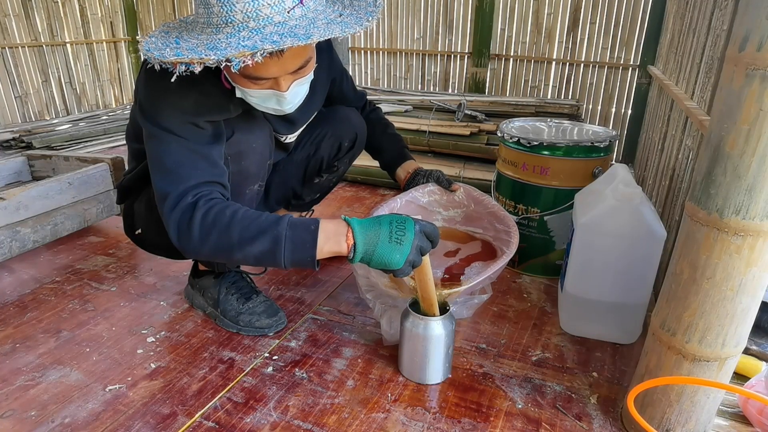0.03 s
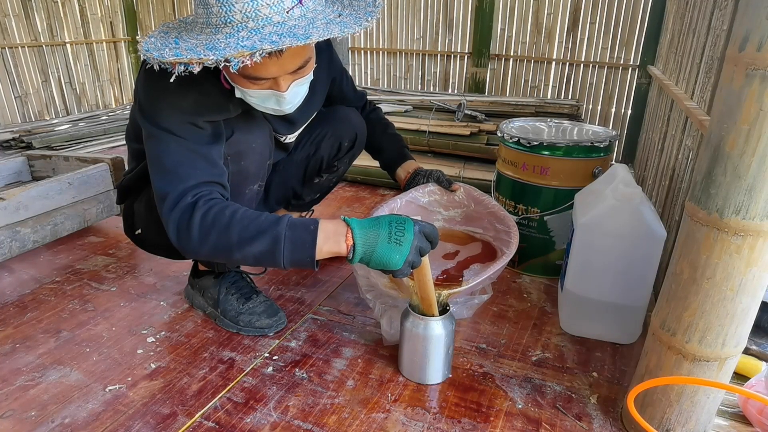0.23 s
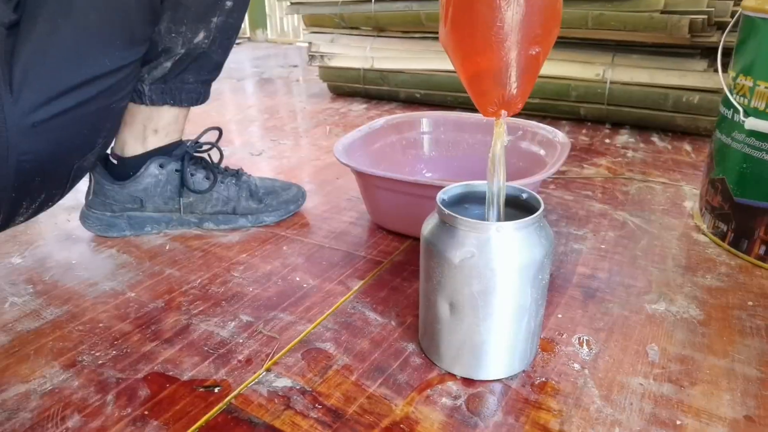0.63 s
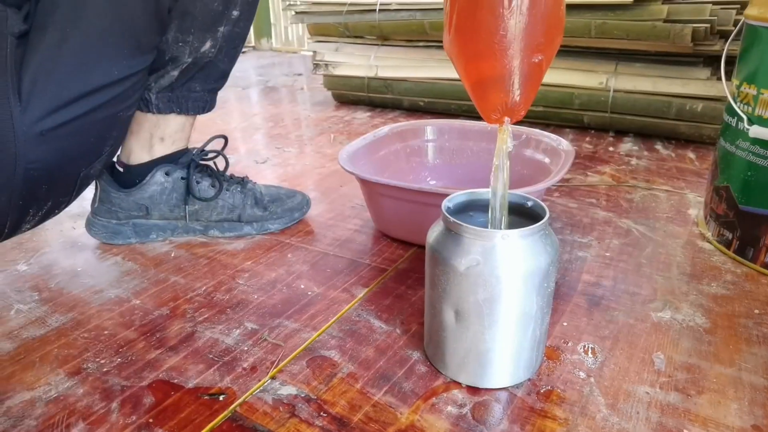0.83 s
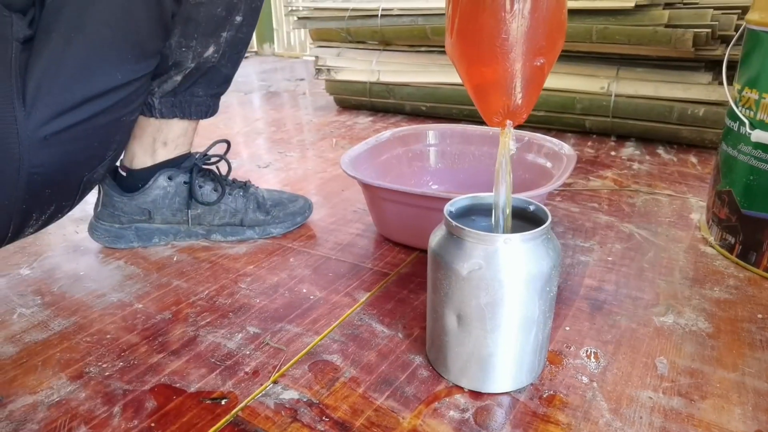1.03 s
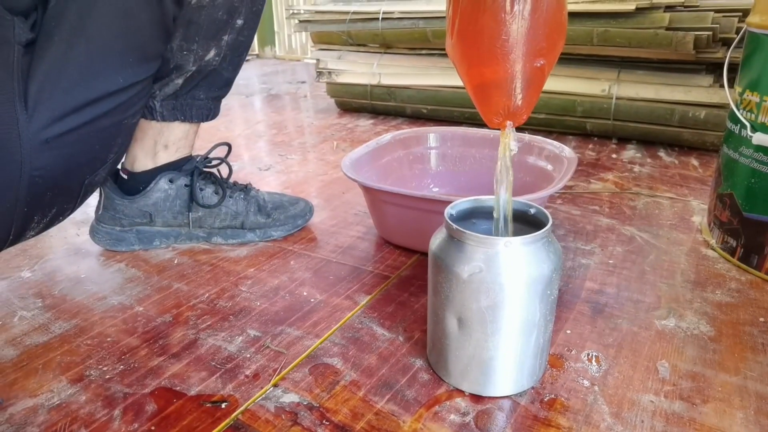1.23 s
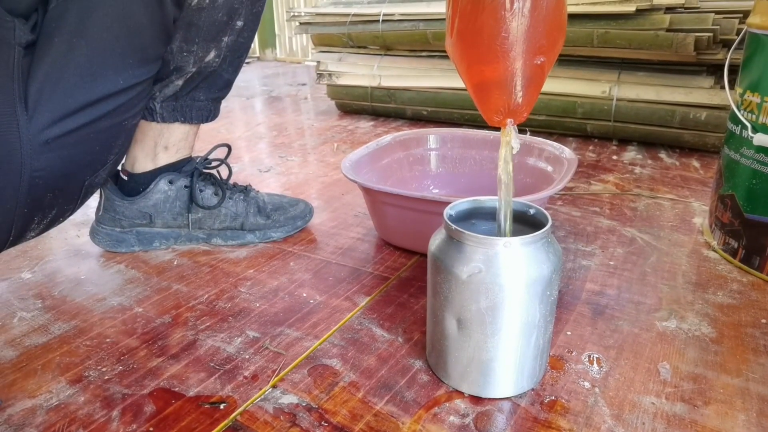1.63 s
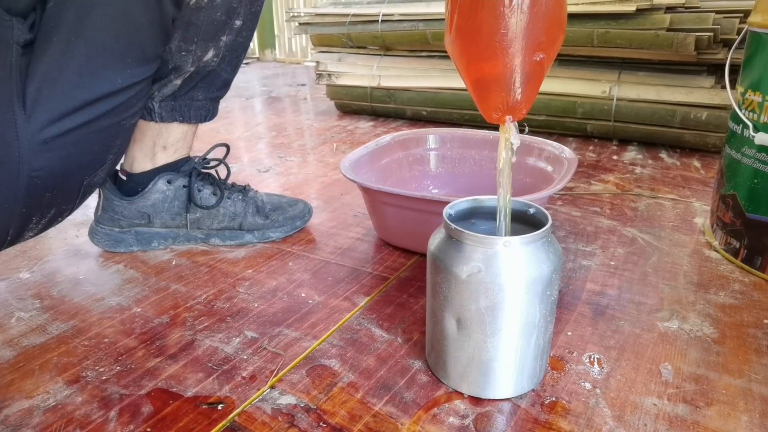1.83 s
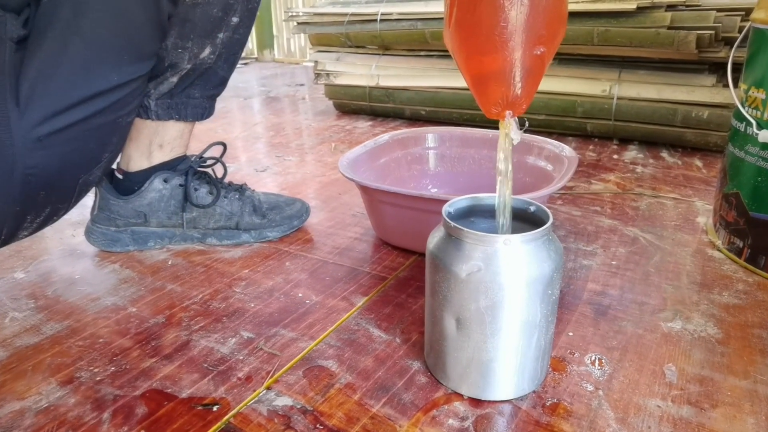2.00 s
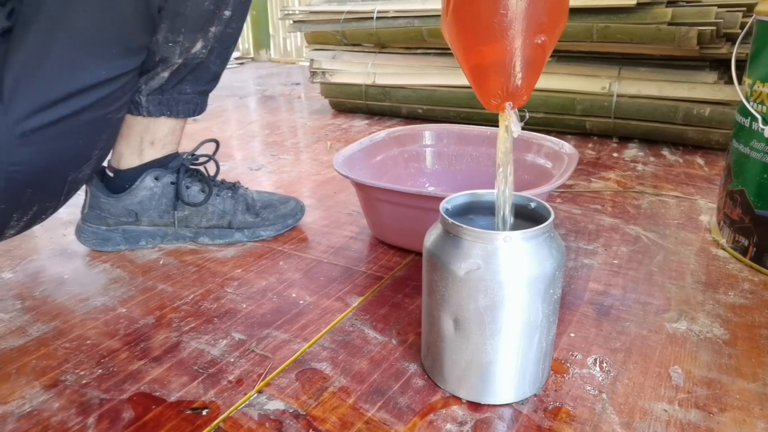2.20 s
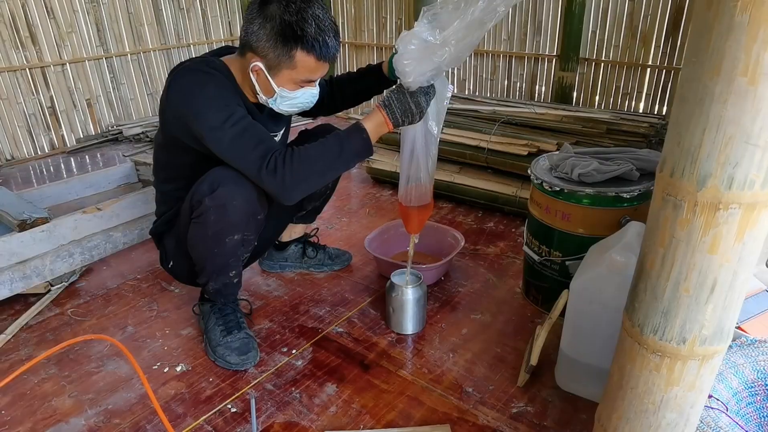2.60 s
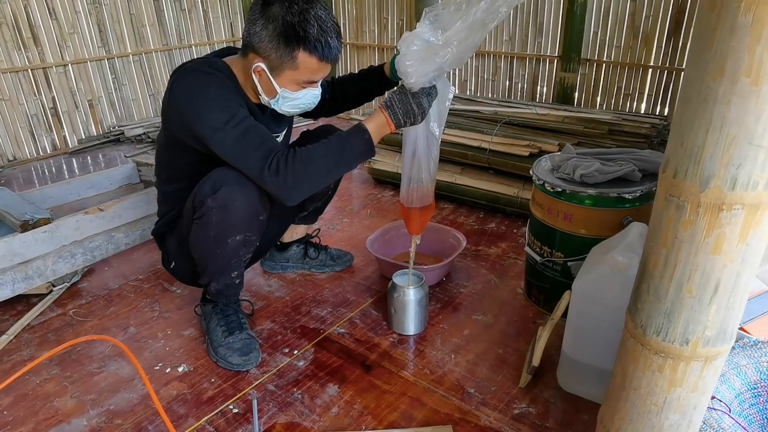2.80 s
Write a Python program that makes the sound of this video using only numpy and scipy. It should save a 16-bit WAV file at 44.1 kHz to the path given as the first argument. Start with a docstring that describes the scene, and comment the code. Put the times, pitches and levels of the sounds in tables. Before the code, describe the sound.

Liquid pours into a small metal canister in a bamboo hut. It first dribbles through a strainer a step away, then streams from a funnel close up, fizzing and gurgling with a rising hollow ring, and ends as a faint, distant trickle.

```python
"""A pattering dribble with one gush, a step away: liquid runs through a strainer into a small metal
canister in a bamboo hut. Then, close up, a stream from a funnel bursts into tiny bubbles, gurgles
and plops, and the air in the canister rings higher as it fills. Last, a faint trickle from across
the hut. Bubbles are short rising rings, blurred by the canister walls and the hut; the air
resonances are driven by random impacts."""
import sys
import numpy as np
from scipy import signal
from scipy.fft import rfft, irfft
from scipy.io import wavfile

SR = 44100
rng = np.random.default_rng(int(sys.argv[2]) if len(sys.argv) > 2 else 0)


def pcm_store(signal):
    """Save signal as 16-bit PCM."""
    levels = np.round(np.clip(np.atleast_2d(signal), -1, 1) * 32767)
    wavfile.write(sys.argv[1], SR, levels.astype(np.int16).T)


N = 130095
T = np.arange(N) / SR
CLOSE_S, AWAY_S, CUT_S = 0.619, 2.657, 0.001  # the listener moves close, then away
WALL_FADE_S, HUT_FADE_S, HUT_DB, FAR_HUT_DB = 0.0024, 0.03, -1.5, -1
NECK_PAN_DB, FIZZ_PAN_DB = 3.5, 1.0  # left over right
DROPS_PER_S, DROP_SPREAD_DB, BUBBLES_PER_S = 2000, 2, 5200


def amp(db):
    """Decibels to gain."""
    return 10 ** (np.asarray(db) / 20)


def unit_rms(x):
    """Scales to an rms of one."""
    return x / np.sqrt(np.mean(x ** 2) + 1e-20)


def unit_burst(x):
    """A short stereo sound at unit energy per side, as samples x sides."""
    short = x[:, :SR // 6].T
    return short / np.linalg.norm(short, axis=0)


def curve(table, column=1):
    """One table column interpolated over time."""
    rows = np.array(table)
    return np.interp(T, rows[:, 0], rows[:, column])


def pan(db):
    """Left and right gains."""
    return amp([[db / 2], [-db / 2]])


def add(mix, start_s, sound):
    """Mixes a sound in, in place."""
    part = mix[round(start_s * SR):][:len(sound)]
    part += sound[:len(part)]


def wander(hz):
    """Low-passed random drift, unit rms."""
    f = np.fft.rfftfreq(N, 1 / SR)
    return unit_rms(irfft(rfft(rng.standard_normal(N)) / (1 + (f / hz) ** 4), N))


def colour(x, spectrum):
    """Minimum-phase filter, unit rms out."""
    hz, db = np.transpose(spectrum)
    f = abs(np.fft.fftfreq(4096, 1 / SR))
    log_gain = np.log(amp(np.interp(np.log(f + 1), np.log(hz), db)))
    taps = np.fft.ifft(np.exp(np.conj(signal.hilbert(log_gain)))).real
    return unit_rms(signal.oaconvolve(x, taps[None], axes=1)[:, :N])


def resonate(x, hz, width_hz, skirt_hz):
    """Two resonators in series at one pitch, which may glide; the second steepens the skirts."""
    carrier = np.exp(2j * np.pi * np.cumsum(hz * np.ones(N)) / SR)
    for band_hz in (width_hz, skirt_hz):
        pole = np.exp(-np.pi * band_hz / SR)
        baseband = signal.lfilter([1 - pole], [1, -pole], x / carrier + 1e-18)
        x = unit_rms((carrier * baseband).real)
    return x


def impacts(per_s, spread_db):
    """Random clicks of uneven size."""
    size = amp(spread_db * np.minimum(rng.exponential(1, N), 4))
    return size * rng.choice([-1, 1], N) * (rng.random(N) < per_s / SR)


def reflect(x, hut_db=HUT_DB, wall_s=WALL_FADE_S):
    """Stereo reflections build and die in the canister, followed by the hut's short tail."""
    t = T[:SR // 6]
    wall_noise, hut_noise = rng.standard_normal((2, 3, len(t)))
    wall_sides = wall_noise[:2] + 0.25 * wall_noise[2]  # partly shared
    wall = unit_rms(wall_sides * np.sqrt(t) * np.exp(-t / wall_s))
    hut = unit_rms(hut_noise[:2] * np.exp(-t / HUT_FADE_S) * (1 - np.exp(-t / wall_s)))
    response = (wall + amp(hut_db) * hut) / np.sqrt(len(t))
    return signal.oaconvolve(x[None], response, axes=1)[:, :N]


def bubble(hz, cycles):
    """A ring that rises in pitch as it dies; `cycles` periods per decay time."""
    age = np.arange(int(6 * cycles * SR / hz)) / SR * hz / cycles  # in decay times
    envelope = (1 - np.exp(-3 * age)) * np.exp(-age)
    return envelope * np.sin(2 * np.pi * cycles * (age + 0.037 * age ** 2 / 2))


def bubbles(per_s, spread_db, hut_db, cycles=2.97, sizes=32):
    """A swarm of bubbles of all sizes, arriving in clumps."""
    clumps = amp(3.5 * wander(hz=65))
    out = np.zeros((2, N))
    for hz in np.geomspace(700, 14500, sizes):
        onsets = impacts(per_s / sizes, spread_db) * clumps
        rings = signal.oaconvolve(onsets, bubble(hz, cycles) * hz)[:N]
        out += reflect(rings, hut_db)
    return unit_rms(out)


def rumble(spectrum, correlation=0.892):
    """Coloured noise, nearly alike on both sides."""
    left, other = rng.standard_normal((2, N))
    right = correlation * left + np.sqrt(1 - correlation ** 2) * other
    return colour(np.array([left, right]), spectrum)


# strained dribble (time [s], patter [dB], canister ring [dB], thudding [dB])
DRIBBLE_LEVELS = [(0, -46.5, -67, -78), (.08, -52.5, -55, -59), (.186, -49, -70, -72),
                  (.205, -41.5, -53, -65), (.27, -42.5, -49.5, -50), (.31, -39.5, -45.5, -43.5),
                  (.345, -46.5, -48.5, -48), (.385, -47.5, -41.5, -45), (.44, -48, -61.5, -57),
                  (.51, -52, -54, -51.5), (.61, -50, -71, -58.5)]
# patter and thud spectra (frequency [Hz], gain [dB])
PATTER_SPECTRUM = [(300, 7), (750, -9.5), (1000, -13.5), (1450, -11.5), (1900, -4.5), (2130, -3),
                   (2380, -2), (2900, -10.5), (4200, -3.5), (4900, -3.5), (5900, 1.5), (7200, -7),
                   (8700, -9.5), (11000, -19.5), (16000, -28)]
THUD_SPECTRUM = [(25, -26), (65, 1), (110, -0.5), (155, 5.5), (230, -13), (310, 0), (450, -8), (700, -46),
                 (1500, -55)]
# canister ring (time [s], pitch [Hz])
EMPTY_PITCH = [(.1, 427), (.25, 416), (.36, 392), (.45, 395)]

def dribble():
    """Strained liquid patters into the nearly empty canister, whose ring sags under the gush."""
    patter = colour(bubbles(DROPS_PER_S, DROP_SPREAD_DB, FAR_HUT_DB), PATTER_SPECTRUM)
    drops = impacts(DROPS_PER_S, DROP_SPREAD_DB)
    ring = resonate(drops, curve(EMPTY_PITCH), width_hz=49, skirt_hz=98)
    patter_gain, ring_gain, thud_gain = (amp(curve(DRIBBLE_LEVELS, column)) for column in (1, 2, 3))
    return patter_gain * patter + ring_gain * ring + thud_gain * rumble(THUD_SPECTRUM)


# hut background (frequency [Hz], gain [dB])
HUSH_SPECTRUM = [(20, -17), (60, -7.5), (120, 0), (172, 2), (245, -7), (300, -10.5), (370, -25.5),
                 (480, -15.5), (650, -28.5), (2000, -29.5), (8000, -25.5), (11000, -36), (16000, -76)]

def hush():
    """Steady low noise of the hut."""
    return amp(-54.5) * rumble(HUSH_SPECTRUM)


# larger drops (time [s], relative level [dB], pitch [Hz])
DRIP_EVENTS = [(0.098, -35.5, 3240), (0.886, -35, 3620), (.91, -32, 3560), (2.19, -35, 2860),
               (2.207, -44, 2020), (2.246, -33, 2890), (2.459, -35.5, 1950), (2.521, -34.5, 3120),
               (2.524, -32.5, 2350), (2.542, -38.5, 2350), (2.818, -47, 2660)]

def drips():
    """Larger drops plink, blurred by the canister walls."""
    out = np.zeros((N, 2))
    for start_s, db, hz in DRIP_EVENTS:
        plink = unit_burst(reflect(bubble(hz, cycles=3.5), hut_db=-3))
        add(out, start_s, amp(db + 14) * plink)
    return out.T


# wet resonance of the gush (time [s], lower pitch [Hz], level [dB])
SQUELCH_TRACK = [(.15, 1730, -60), (.2, 1830, -62), (.235, 1870, -42), (.27, 1970, -71), (.315, 1930, -46),
                 (.345, 2000, -57), (.378, 2160, -44), (.42, 2210, -76)]

def squelch():
    """Two wet resonances rise as the gush passes."""
    hz = curve(SQUELCH_TRACK)
    drops = impacts(DROPS_PER_S, DROP_SPREAD_DB)
    low, high = (resonate(drops, f, width_hz=90, skirt_hz=180) for f in (hz, 2.2 * hz))
    return unit_rms(reflect(low + amp(-6) * high)) * amp(curve(SQUELCH_TRACK, 2))


# deep gurgles (time [s], length [s], pitch [Hz], level [dB])
GURGLE_EVENTS = [(0.612, 0.035, 149, -43.5), (0.679, 0.068, 177, -41.5), (0.832, 0.032, 167, -41),
                 (1.14, 0.031, 172, -39), (1.313, 0.15, 172.9, -44.5), (1.832, 0.083, 176, -42.5),
                 (1.9, 0.062, 162, -35.5), (1.978, 0.091, 160, -38), (2.129, 0.11, 157.3, -38.5),
                 (2.312, 0.11, 151.2, -42), (2.421, 0.14, 178, -42.5)]

def gurgles():
    """Deep, wobbling notes swell and die under the stream."""
    out = np.zeros(N)
    wobble = 1 + 0.031 * wander(hz=30.4)
    for start_s, length_s, hz, db in GURGLE_EVENTS:
        swell = np.sin(np.pi * np.clip((T - start_s) / length_s, 0, 1) ** 0.76)
        out += amp(db) * swell * np.sin(2 * np.pi * np.cumsum(hz * wobble) / SR)
    return out


# tiny bubbles (frequency [Hz], gain [dB])
FIZZ_SPECTRUM = [(300, -27), (900, -22.5), (1350, -41), (2000, -20), (2800, -11.5), (3700, -8), (5000, -8),
                 (6100, 1.5), (7000, -5), (8100, 3), (9300, -2.5), (10600, -4.5), (11700, -12),
                 (13000, -10), (16000, -17.5)]

def fizz(splashes):
    """A spray of tiny bubbles, with spatter from the splashes and longer plinks."""
    spray = bubbles(BUBBLES_PER_S, spread_db=3.5, hut_db=HUT_DB)
    spatter = unit_rms(reflect(splashes))
    plinks = bubbles(per_s=420, spread_db=2.8, hut_db=-7, cycles=9)
    return colour(spray + amp(-12) * spatter + amp(-7.5) * plinks, FIZZ_SPECTRUM)


# higher air modes of the canister (frequency [Hz], width [Hz], relative level [dB])
AIR_MODES = [(1105, 65, -12), (1775, 70, -9), (2075, 100, -1), (2230, 150, -2), (2470, 120, -13),
             (5080, 110, -3), (5815, 110, 1), (7865, 130, 0)]

def cavity_ring(splashes):
    """Splashes ring the air above the liquid."""
    modes = sum(amp(db) * resonate(splashes, hz, width_hz, skirt_hz=440) for hz, width_hz, db in AIR_MODES)
    return unit_rms(modes + amp(-1.5) * reflect(modes))


# close stream (time [s], fizz [dB], cavity ring [dB], churning [dB])
STREAM_LEVELS = [(.62, -40.5, -48, -46), (.78, -42.5, -53.5, -50.5), (.88, -37.5, -49, -57),
                 (1.0, -41, -49.5, -49.5), (1.1, -40, -53.5, -50), (1.3, -41.5, -50, -55),
                 (1.52, -38.5, -52, -44), (1.66, -42.5, -56.5, -48), (1.94, -42, -52.5, -46.5),
                 (2.12, -43, -52.5, -44), (2.19, -40.5, -63, -41.5), (2.35, -43, -65, -41),
                 (2.46, -40.5, -80, -45.5), (2.65, -45.5, -59.5, -45)]
# low churning (frequency [Hz], gain [dB])
CHURN_SPECTRUM = [(25, -43), (45, -23), (62, -1.5), (110, -5.5), (140, -3), (172, 2), (205, -2), (255, -15),
                  (305, -9.5), (390, -25), (520, -27.5), (900, -70)]

def stream():
    """The stream lands in uneven surges: it fizzes, rings the cavity and churns the liquid."""
    splashes = unit_rms(impacts(per_s=300, spread_db=4.5) * amp(2.5 * wander(hz=22.7)))
    fizz_gain, cavity_gain, churn_gain = (amp(curve(STREAM_LEVELS, column)) for column in (1, 2, 3))
    splashing = fizz_gain * fizz(splashes) + cavity_gain * cavity_ring(splashes)
    return pan(FIZZ_PAN_DB) * splashing + churn_gain * rumble(CHURN_SPECTRUM)


# air resonance of the neck (time [s], pitch [Hz])
NECK_PITCH = [(.62, 572.5), (1.2, 579), (1.75, 593.6), (2.15, 602), (2.4, 616), (2.65, 648)]
# its sustained ring (time [s], level [dB])
NECK_LEVEL = [(.62, -61.5), (.73, -59.5), (.78, -62), (.85, -58.5), (.98, -53), (1.15, -56.5), (1.2, -65.5),
              (1.38, -61), (1.52, -53.5), (1.65, -51), (1.7, -58.5), (1.8, -48.5), (1.94, -67),
              (2.05, -52.5), (2.25, -53.5), (2.34, -47), (2.53, -54.5), (2.65, -53)]

def neck_ring():
    """Drops keep the air in the neck ringing, higher as the canister fills."""
    drops = impacts(per_s=1500, spread_db=-1)
    ring = resonate(drops, curve(NECK_PITCH), width_hz=20.7, skirt_hz=290)
    return pan(NECK_PAN_DB) * ring * amp(curve(NECK_LEVEL))


# bubble bursts (time [s], relative ring level [dB], pitch [Hz], relative crack level [dB])
POP_EVENTS = [(.6518, -27, 8100, -40), (.654, -25, 5650, -42), (0.6922, -31, 9900, -25),
              (.7251, -27.5, 7930, -25), (0.8081, -23, 7850, -25.5), (0.8067, -26.5, 4700, -37),
              (0.817, -26, 4000, -23.5), (.8593, -25, 7950, -39), (.871, -25.5, 6200, -39),
              (0.876, -25, 5660, -35), (.939, -29, 4820, -46.5), (1.0206, -21.5, 7500, -29),
              (1.0315, -29.5, 10300, -39), (1.1895, -21, 5470, -25), (1.1986, -23, 5840, -40),
              (1.2205, -22, 7660, -30), (1.2375, -23.5, 8250, -41), (1.2779, -26.5, 7600, -44),
              (1.3027, -25.5, 8500, -42), (1.3417, -28, 5700, -27), (1.363, -31.5, 5200, -44),
              (1.3729, -22, 12730, -22), (1.3844, -17.5, 7770, -24), (1.434, -34, 8700, -24.5),
              (1.4768, -25, 9750, -44), (1.5248, -24, 8800, -42), (1.546, -28, 7600, -41),
              (1.7089, -24.5, 5470, -28), (1.7865, -25.5, 7900, -28), (1.916, -26, 9800, -40),
              (1.9356, -25, 8400, -35), (1.9847, -26.5, 5840, -32), (1.988, -25.5, 7550, -38),
              (2.3265, -31, 8260, -29), (2.4356, -24.5, 9100, -34), (2.4733, -26.5, 6250, -22.5),
              (2.574, -25.5, 7270, -39), (2.6527, -28.5, 5660, -33.5)]
# their crack (frequency [Hz], gain [dB])
CRACK_SPECTRUM = [(500, -35), (1500, -24.5), (3000, -9), (5000, 4.5), (8000, 6.5), (11000, 0.5),
                  (14000, -9), (16000, -7)]

def pops():
    """Single loud bubbles burst inside the canister: a broadband crack and a short ring."""
    out = np.zeros((N, 2))
    for start_s, ring_db, hz, crack_db in POP_EVENTS:
        ring = unit_burst(reflect(bubble(hz, cycles=7.7), hut_db=-10, wall_s=0.002))
        click = reflect(np.ones(1), hut_db=-10, wall_s=0.00085)
        crack = unit_burst(colour(click, CRACK_SPECTRUM))
        add(out, start_s, amp(ring_db) * ring + amp(crack_db) * crack)
    return amp(13.5) * pan(FIZZ_PAN_DB) * out.T


# dull bumps (time [s], level [dB])
BUMP_EVENTS = [(0.814, -41.5), (0.842, -48.5), (1.262, -45), (2.731, -48)]
# their noise (frequency [Hz], gain [dB])
BUMP_SPECTRUM = [(25, -44), (70, 6.5), (170, -3.5), (300, -3.5), (480, -21.5), (900, -26), (3000, -74),
                 (9000, -59)]

def bumps(rise_s=0.00054, fade_s=0.029):
    """Soft, dull knocks that do not ring."""
    envelope, t = np.zeros(N), T[:SR // 6]
    knock = (1 - np.exp(-t / rise_s)) * np.exp(-t / fade_s)
    for start_s, db in BUMP_EVENTS:
        add(envelope, start_s, amp(db) * knock)
    return envelope * rumble(BUMP_SPECTRUM)


# air pockets (time [s], relative neck level [dB], relative air mode level [dB])
PLOP_EVENTS = [(.818, -27, -36.5), (.94, -53, -59), (.975, -31, -41.5), (1.05, -40, -36), (1.14, -34, -53),
               (1.258, -45, -41), (1.5, -51, -54), (1.532, -30, -56), (1.615, -32.5, -41),
               (1.752, -33.5, -41), (1.903, -59, -51), (1.992, -34.5, -57), (2.045, -35, -43),
               (2.186, -30.5, -52), (2.285, -27.5, -55), (2.3, -22, -50), (2.314, -21.5, -47),
               (2.368, -17.5, -41), (2.413, -26, -43), (2.579, -29.5, -45), (2.65, -38, -42)]

def plops(rise_s=0.0037, ring_fade_s=0.0058, thump_hz=153, thump_fade_s=0.0044):
    """Pockets of air collapse: the neck and the air below it ring over a low thump."""
    out, t = np.zeros(N), T[:SR // 10]
    attack = 1 - np.exp(-(t / rise_s) ** 2)
    thump = amp(-9.5) * np.sin(2 * np.pi * thump_hz * t) * np.exp(-t / thump_fade_s)
    modes = sum(amp(db) * np.sin(2 * np.pi * hz * t) * np.exp(-np.pi * width_hz * t / 2)
                for hz, width_hz, db in AIR_MODES[:5])
    for start_s, neck_db, modes_db in PLOP_EVENTS:
        neck_hz = np.interp(start_s, *np.transpose(NECK_PITCH))
        ring = np.sin(2 * np.pi * neck_hz * t) * np.exp(-t / ring_fade_s)
        add(out, start_s, attack * (amp(neck_db) * (ring + thump) + amp(modes_db) * modes))
    return amp(-1) * pan(NECK_PAN_DB) * out


# coarse froth (time [s], level [dB])
FROTH_LEVEL = [(1.9, -61.5), (2.13, -63), (2.19, -50.5), (2.27, -59.5), (2.34, -48.5), (2.48, -62),
               (2.54, -55), (2.65, -61.5)]
# its bubbles (frequency [Hz], gain [dB])
FROTH_SPECTRUM = [(500, -44), (800, 4), (1300, 2), (2400, 6.5), (3300, 0.5), (5500, -13.5), (9000, -47),
                  (15000, -74)]

def froth():
    """Coarse bubbles grow louder as the liquid nears the neck."""
    swarm = bubbles(per_s=1300, spread_db=4.5, hut_db=4.5, cycles=8.9)
    return pan(NECK_PAN_DB) * colour(swarm, FROTH_SPECTRUM) * amp(curve(FROTH_LEVEL))


# distant stream (frequency [Hz], gain [dB])
TRICKLE_SPECTRUM = [(300, -18), (900, 1.5), (1400, -1), (2400, 1), (3700, -7), (6300, 3.5), (8300, -1.5),
                    (10500, -12), (13000, -26), (16000, -46)]

def far_trickle():
    """The stream's bubbles from across the hut."""
    return amp(-60) * colour(bubbles(BUBBLES_PER_S, DROP_SPREAD_DB, FAR_HUT_DB), TRICKLE_SPECTRUM)


def scene():
    """Three listening positions in turn; drips, bumps and hush run throughout."""
    close, away = (np.clip((T - s) / CUT_S + 0.5, 0, 1) for s in (CLOSE_S, AWAY_S))
    strained = (1 - close) * (dribble() + squelch())
    poured = (close - away) * (gurgles() + stream() + neck_ring() + pops() + plops() + froth())
    return strained + poured + away * far_trickle() + drips() + bumps() + hush()


def record(dry):
    """Low-pass at 16.1 kHz."""
    taps = signal.firwin(511, 16100, window=("kaiser", 9), fs=SR)
    return signal.oaconvolve(dry, taps[None], "same")


dry = scene()
out = record(dry)
pcm_store(out)
```